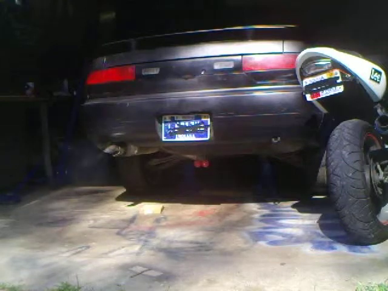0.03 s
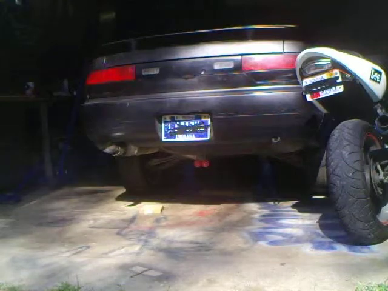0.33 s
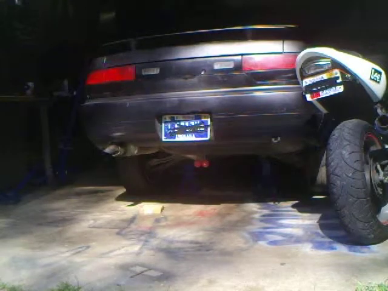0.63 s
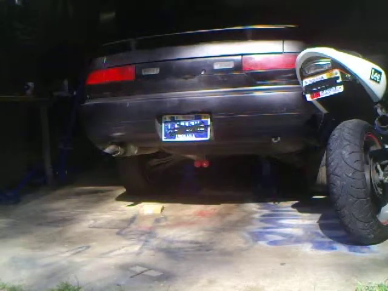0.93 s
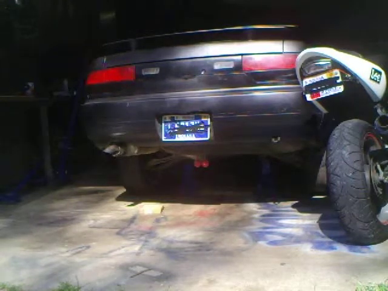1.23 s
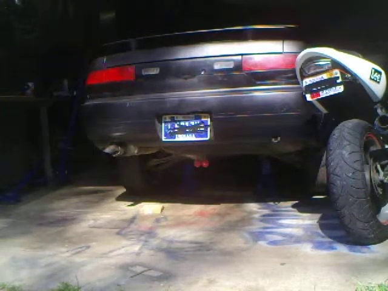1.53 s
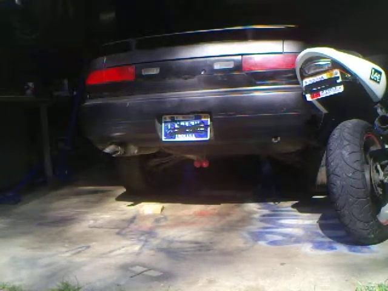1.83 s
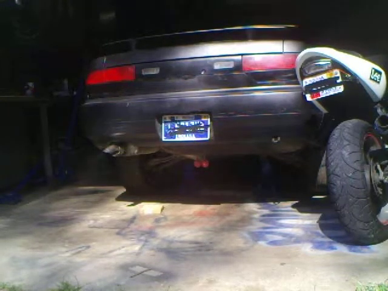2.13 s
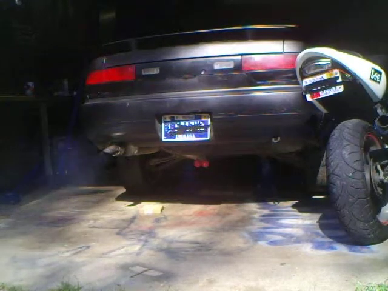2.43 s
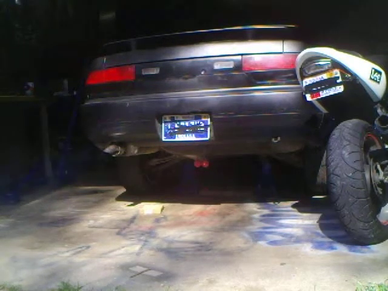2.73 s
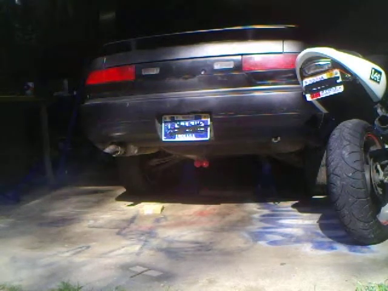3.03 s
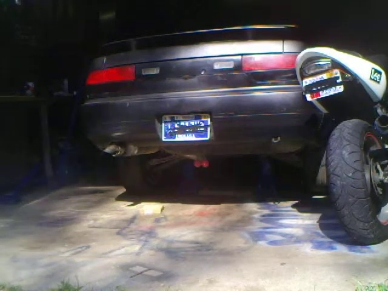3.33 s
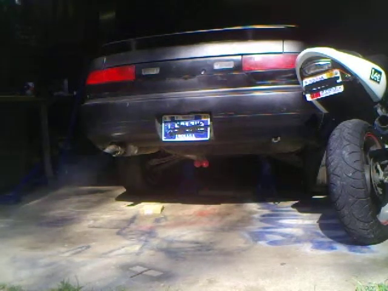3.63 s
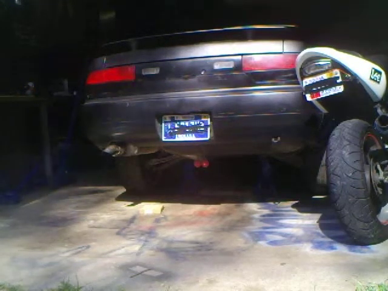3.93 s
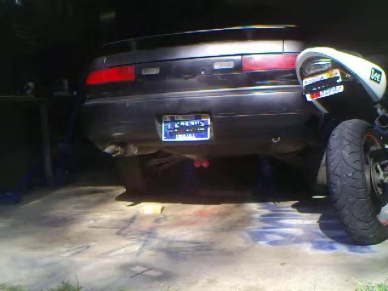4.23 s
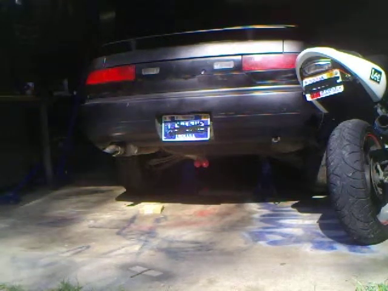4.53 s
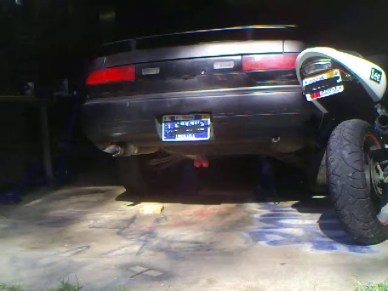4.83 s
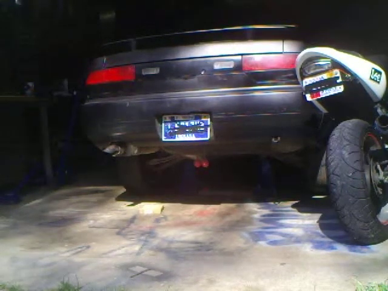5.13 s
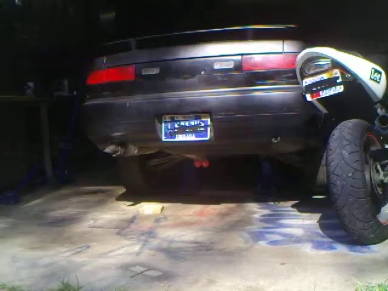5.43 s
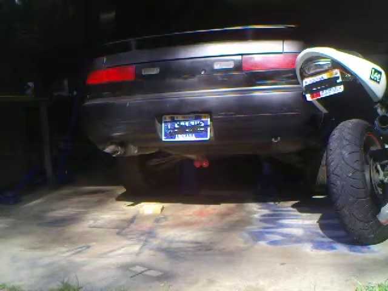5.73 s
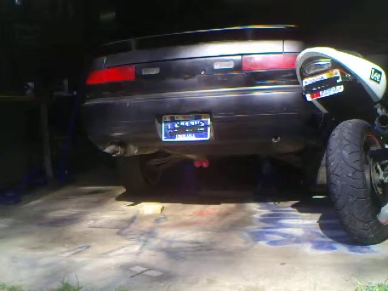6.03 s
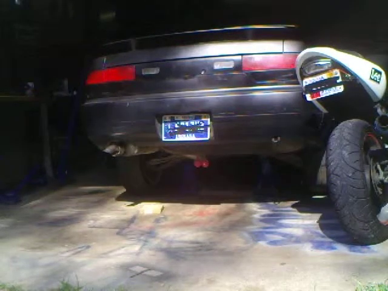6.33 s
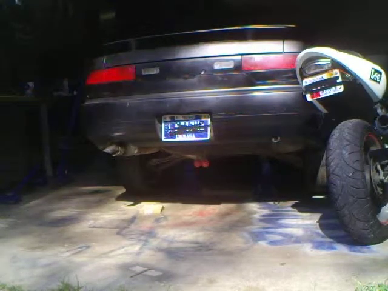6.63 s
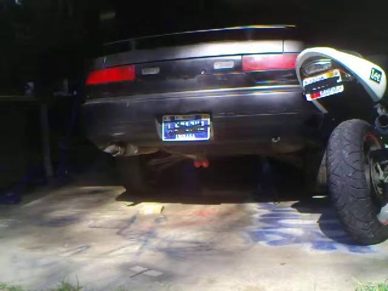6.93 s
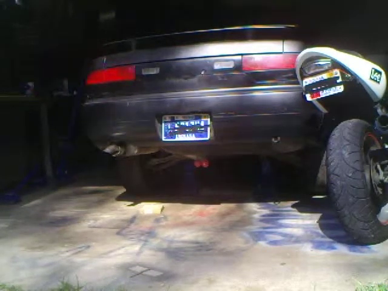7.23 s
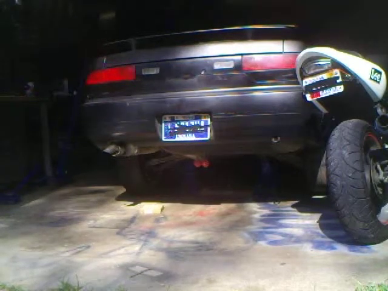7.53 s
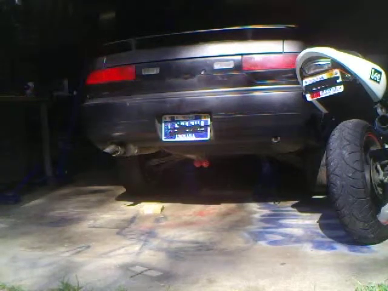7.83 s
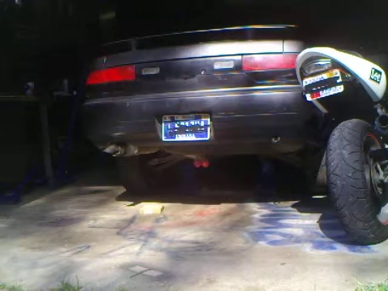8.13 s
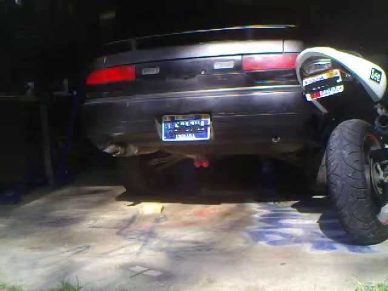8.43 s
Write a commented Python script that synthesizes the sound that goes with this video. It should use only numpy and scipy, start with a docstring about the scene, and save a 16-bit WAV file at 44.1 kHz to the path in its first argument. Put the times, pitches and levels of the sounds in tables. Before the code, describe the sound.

From a few metres behind a car in a garage, a small microphone with little treble picks up a boomy, raspy exhaust. The engine surges, sputters and falls toward idle, then climbs steeply and hits high revs three times, misfiring and popping. It winds slowly down to a quieter rumble with softly whirring belts. Two gentle blips follow, with a single exhaust pop between them.

```python
"""A loud four-cylinder exhaust flares up in a garage, is revved hard until it stutters, sinks to idle
and is blipped twice. Each firing sends a pressure spike and a rasp of gas down the ringing tailpipe;
unburnt fuel pops in it. Fan and belts whir at light load.
Heard a few metres behind the car through a small narrow-band microphone."""
import sys
import numpy as np
from scipy import signal
from scipy.fft import rfft, irfft
from scipy.io import wavfile
from scipy.ndimage import uniform_filter1d

SR = 44100
rng = np.random.default_rng(int(sys.argv[2]) if len(sys.argv) > 2 else 0)


def file_out(sig):
    """Save sig as 16-bit WAV at sys.argv[1]."""
    # one column per channel
    cols = np.atleast_2d(sig).T
    # limit, then scale
    lim = np.clip(cols, -1, 1)
    pcm = np.round(lim * 32767).astype(np.int16)
    wavfile.write(sys.argv[1], SR, pcm)


N = 378819
TIME_S = np.arange(N) / SR

# engine speed: t/s, firing rate/Hz
ENGINE_SPEED = [(0.0, 91.86), (0.23, 124), (1.13, 71.5), (1.6, 50.7), (1.99, 47.74), (2.67, 180.2),
                (3.07, 164.07), (3.31, 193.9), (3.63, 170.2), (3.88, 193.7), (4.46, 150.5), (5.15, 106.1),
                (6.08, 55.72), (6.6, 43.45), (6.92, 43.12), (7.26, 74.93), (7.7, 54.37), (8.32, 43.57),
                (8.59, 61.4)]
# throttle presses: t open/s, t close/s, rise/s, load/0-1
PRESSES = [(-.1, 0.177, .05, .32), (1.693, 1.967, 0.11, 0.02), (1.952, 2.654, 0.055, 0.89),
           (3.06, 3.273, 0.027, 0.96), (3.625, 3.76, .04, 0.81), (6.75, 7.092, 0.32, 0.22),
           (7.074, 7.306, 0.03, 0.03), (8.224, 8.62, .3, 0.12)]
# misfiring spells: t start/s, t end/s, severity/0-1, sag of drone, bark and rasp/dB
MISFIRE_SPELLS = [(0.228, 0.375, 0.65, -7), (.36, 0.541, 0.5, -2.5), (1.37, 1.55, 0, -2),
                  (2.88, 2.98, 0.83, 0), (2.98, 3.052, 0.9, -5.5), (3.279, 3.63, 0.6, 1.5),
                  (3.601, 3.653, 0.94, -7), (3.826, 4.12, 0.76, 0.5), (6.072, 6.24, 0.43, -1)]
# afterfire: t/s, crack level/dB, thump level/dB
AFTERFIRE_POPS = [(0.2942, -16, -4), (0.3373, -3.5, -40), (1.476, -27, -17), (2.945, 2, -16),
                  (3.325, -10, -20), (3.474, -0.5, -8), (3.583, -3, -4), (3.614, 1, -32), (3.868, -3.5, -9),
                  (4.044, -3.5, -15), (4.112, 5, -12.5), (5.12, -18, -24), (6.18, -31, -14),
                  (7.592, -5.5, -22), (7.679, -39, -12.5)]
# imbalance of the four cylinders in uneven combustion: level/dB
IMBALANCE_DB = [3.5, -0.5, -3.5, 3]

# standing-wave boom: firing rate/Hz, level shut/dB, level open/dB
BOOM_BY_RATE = [(43, -53, -41), (47, -45, -32), (54, -39.5, -40), (62.6, -35, -32), (73, -25, -34),
                (89.8, -23.5, -16), (95.6, -28.5, -21), (102.6, -23, -17.5), (121.2, -29, -24),
                (125, -17.5, -16.5), (147, -18, -13), (166, -23, -17), (171, -24, -16)]
# gas flow, as the equivalent shut-throttle rate: firing rate/Hz, bark level/dB, rasp level/dB
LEVELS_BY_FLOW = [(43.3, -62, -51), (50.3, -59.5, -48.5), (61, -42.5, -43), (81, -32.5, -39.5),
                  (95.5, -35, -37.5), (113.5, -24.5, -28), (133.3, -16.5, -19.5), (153, -20, -20),
                  (183.75, -19.5, -17.5), (260, -20, -15)]
# throttle shut: firing rate/Hz, drone level/dB, unevenness/0-1
COAST_BY_RATE = [(43, -38.5, 0.3), (49.5, -41, 0.5), (67, -32, 0.1), (78, -38, .3), (109, -38, .55),
                 (125, -41.5, .1), (154, -43, .1), (176, -35.5, 0.5)]
# throttle open: firing rate/Hz, thrum level/dB, bark change/dB
PULL_BY_RATE = [(43.1, -35, 3), (53, -25, 1), (73.4, -26, -5), (90, -18.5, -2.5), (121, -25, 1.5),
                (184, -52.5, -1)]

# tailpipe resonances: f/Hz, width/Hz, level/dB
PIPE_MODES = [(273.4, 30, 5.5), (339.4, 15, 6), (456.7, 49, 7), (518.7, 37, 8.5), (599, 51, 8),
              (724.5, 22, 11), (817, 12, 5.5), (843, 8.3, 7.5), (882, 10, 4), (1076.5, 16, 5.5),
              (1591, 40, 3.5), (1980, 31, 2), (2280, 60, -4), (2405, 46, 5.5), (3200, 120, 2),
              (3483, 99, 5.5)]
# pressure spike: f/Hz, level/dB
SPIKE_SPECTRUM = [(70, -3), (150, -1.5), (260, 2.5), (380, 0.5), (550, -2), (800, -1.5), (1050, -15),
                  (1500, -10.5), (2100, -7), (2800, -13), (3600, -21), (4500, -17)]
# gas churning in the pipe: f/Hz, level/dB
CHURN_SPECTRUM = [(100, -12), (270, -2.5), (450, -1.5), (800, -5.5), (1600, -21)]
# silencer, coasting: f/Hz, level/dB
DRONE_SPECTRUM = [(25, -13), (60, -11), (88, 12.5), (108, -16), (128, -2.5), (148, 9), (178, -3.5),
                  (260, -7), (420, -50.5), (1000, -79)]
# silencer under load: f/Hz, level/dB
THRUM_SPECTRUM = [(50, -20.5), (95, 4), (155, 5.5), (210, -7.5), (300, -7.5), (450, -29.5), (1000, -51)]
# gas rasp: f/Hz, level/dB
RASP_SPECTRUM = [(60, -13.5), (300, -17), (600, -10), (950, -4), (1200, -5.5), (1450, -8), (1900, -1.5),
                 (2400, -3), (2800, -10), (3650, -4.5), (4500, -11.5)]
# afterfire crack: f/Hz, level/dB
CRACK_SPECTRUM = [(40, -10), (200, -5), (480, -6.5), (740, 1.5), (1100, 0.5), (2100, 5), (2800, -2),
                  (3600, 4), (4500, -11.5)]
# fan and belts: f/Hz, level/dB
WHIR_SPECTRUM = [(100, -13), (280, 4), (380, 0.5), (475, 3.5), (560, -13.5), (930, -8), (1170, 6.5),
                 (1470, -5), (2400, 0.5), (2700, -5.5), (3200, 1), (3650, -3.5), (4000, -10.5)]


def exhaust(shock_db=7):
    """Firings boom, drone in the silencer, bark in the tailpipe and rasp; bay whir is blended in."""
    rate_hz, load, pull, misfire, sag_db = engine()
    uneven, boom_db, drone_db, thrum_db, bark_db, rasp_db = response(rate_hz, load, pull, misfire, sag_db)
    phase, spikes, age_s, strength = firings(rate_hz, uneven)
    # mean flow is silent, its fundamental is the boom, the rest excites the pipe
    spikes = spikes - (1 + 2 * np.cos(phase)) * rate_hz / SR
    boom = np.sqrt(2) * np.cos(phase) * undb(boom_db)
    drone = silencer(spikes, pull, drone_db, thrum_db)
    steep = .5 + .5 * np.tanh((bark_db + 27) / 10)  # 0 round wave, 1 shock
    ring = tailpipe(spikes, steep)
    puffs = gas_puffs(age_s, strength, load)
    bark = (ring + gas_churn(puffs, steep)) * undb(bark_db)
    rasp = gas_rasp(puffs, undb(shock_db) * steep * spikes)
    return boom + drone + bark + blend_engine_bay(rasp, rasp_db, rate_hz)


def engine(flywheel_s=.08, close_s=0.034, misfire_edge_s=0.013, half_pull_load=0.027):
    """Running state: flywheel-smoothed speed, throttle load and misfiring."""
    rate_hz = np.interp(TIME_S, *np.transpose(ENGINE_SPEED))
    rate_hz = uniform_filter1d(rate_hz, int(flywheel_s * SR), mode="nearest")
    load = sum(depth * gate(start_s, end_s, rise_s, close_s) for start_s, end_s, rise_s, depth in PRESSES)
    load = np.clip(load, 0, 1)
    pull = load / (load + half_pull_load)  # 0 coasting, near 1 driving
    misfire, sag_db = sum(np.outer(effects, gate(start_s, end_s, misfire_edge_s, misfire_edge_s))
                          for start_s, end_s, *effects in MISFIRE_SPELLS)
    return rate_hz, load, pull, misfire, sag_db


def response(rate_hz, load, pull, misfire, sag_db, load_flow=0.44, load_uneven=.08,
             load_bark_db=5, load_rasp_db=2, misfire_boom_db=-5.5, misfire_drone_db=7):
    """Unevenness and layer levels: load adds gas and evens the burn; misfires break it into rumble."""
    shut_db, open_db = at_rate(BOOM_BY_RATE, rate_hz)
    drone_db, uneven = at_rate(COAST_BY_RATE, rate_hz)
    thrum_db, bark_change_db = at_rate(PULL_BY_RATE, rate_hz)
    bark_db, rasp_db = at_rate(LEVELS_BY_FLOW, rate_hz * (1 + load_flow * load)) + sag_db
    uneven = uneven + (load_uneven - uneven) * load + misfire
    boom_db = shut_db + (open_db - shut_db) * pull + misfire_boom_db * misfire
    drone_db = drone_db + misfire_drone_db * misfire + sag_db
    bark_db = bark_db + bark_change_db * pull + load_bark_db * load
    rasp_db = rasp_db + load_rasp_db * load
    return uneven, boom_db, drone_db, thrum_db, bark_db, rasp_db


def firings(rate_hz, uneven, scatter_db=3.5, jitter_cycles=.035, lead_cycles_per_db=.009):
    """One pressure spike per firing; uneven burns differ in strength and timing."""
    cycles = np.cumsum(rate_hz) / SR
    index = np.arange(1, int(cycles[-1]))
    rough = np.clip(np.interp(index, cycles, uneven), 0, 1)
    timing_draw, level_draw = rng.standard_normal((len(index), 2)).T
    cylinder_db = np.take(IMBALANCE_DB, index, mode="wrap")
    # stronger waves run faster and arrive early: growl between the harmonics
    shift_cycles = rough * (jitter_cycles * timing_draw - lead_cycles_per_db * cylinder_db)
    onset_s = np.interp(index + shift_cycles, cycles, TIME_S)
    strength = undb(rough * (cylinder_db + scatter_db * level_draw))
    strength /= uniform_filter1d(strength, size=8)
    spikes = np.zeros(N)
    spikes[np.round(onset_s * SR).astype(int)] = strength
    latest = np.maximum(np.searchsorted(onset_s, TIME_S) - 1, 0)
    age_s = np.abs(TIME_S - onset_s[latest])
    return 2 * np.pi * cycles, spikes, age_s, strength[latest]


def tailpipe(spikes, steep, soft_hz=340):
    """Spikes ring the pipe; strong waves steepen into shocks, weak ones stay round."""
    sharp = colour(spikes, SPIKE_SPECTRUM, PIPE_MODES)
    ring = steep * sharp + (1 - steep) * lowpass(sharp, soft_hz)
    return unit_rms(garage(ring, wet_db=-14, wall_db=-17))


def silencer(spikes, pull, drone_db, thrum_db):
    """Hollow drone when coasting; a little throttle turns it into a full thrum."""
    drone = unit_rms(colour(spikes, DRONE_SPECTRUM)) * undb(drone_db)
    thrum = unit_rms(colour(spikes, THRUM_SPECTRUM)) * undb(thrum_db)
    return (1 - pull) * drone + pull * thrum


def gas_puffs(age_s, strength, load, decay_s=0.0028, leak=0.51):
    """A gas burst after each firing, over a steady flow that fades with load."""
    burst = strength ** 1.24 * np.exp(-age_s / decay_s)
    return (leak * (1 - 0.97 * load) + burst) * rng.standard_normal(N)


def gas_churn(puffs, steep, level_db=-6):
    """Gas churns in the pipe and blurs the note, most when the waves are weak."""
    return undb(level_db) * (1 - .78 * steep) * unit_rms(colour(puffs, CHURN_SPECTRUM, PIPE_MODES))


def gas_rasp(puffs, shocks):
    """Puffs and shocks leave the pipe as a bright rasp."""
    return unit_rms(garage(colour(puffs + shocks, RASP_SPECTRUM, PIPE_MODES), wet_db=-7))


def afterfire(shock_s=0.0007, burn_s=0.0085, burn_db=-8, thump_s=0.0023, thump_db=-5, crack_db=1):
    """Unburnt fuel pops: shock front, short roar of burning gas, thump in the silencer."""
    crack, thump = np.zeros(N), np.zeros(N)
    age_s = TIME_S[:SR // 8]
    shock = age_s / shock_s * np.exp(1 - age_s / shock_s)
    for onset_s, pop_crack_db, pop_thump_db in AFTERFIRE_POPS:
        start = int(onset_s * SR)
        span = slice(start, start + len(age_s))
        roar = undb(burn_db) * rng.standard_normal(len(age_s)) * np.exp(-age_s / burn_s)
        crack[span] += undb(pop_crack_db) * (shock + roar)
        thump[span] += undb(pop_thump_db) * np.exp(-age_s / thump_s)
    crack = garage(colour(crack, CRACK_SPECTRUM, PIPE_MODES), wet_db=-1.5)
    return undb(crack_db) * crack + undb(thump_db) * colour(thump, DRONE_SPECTRUM)


def blend_engine_bay(rasp, rasp_db, rate_hz, crossover_db=-40, db_per_octave=9, trim_db=3.0):
    """Fan and belt whir replaces a weak rasp at equal power; the crossover level rises with speed."""
    threshold_db = crossover_db + db_per_octave * np.log2(rate_hz / 100)
    whir_share = 1 / (undb(rasp_db - threshold_db) ** 2 + 1)
    whir = unit_rms(colour(rng.standard_normal(N), WHIR_SPECTRUM))
    return (np.sqrt(1 - whir_share) * rasp + np.sqrt(whir_share) * whir) * undb(rasp_db + trim_db)


def garage(x, wet_db, t60_s=0.26, build_s=0.00093, wall_s=.016, wall_db=-10, highpass_hz=260):
    """Direct sound, plus back-wall slap and short diffuse tail above the bass."""
    age_s = TIME_S[:SR // 2]
    tail = rng.standard_normal(len(age_s)) * undb(-60 * age_s / t60_s) * (1 - np.exp(-age_s / build_s))
    tail *= undb(wet_db) / np.sqrt(np.sum(tail ** 2))
    tail[int(wall_s * SR)] += undb(wall_db)
    tail = signal.sosfilt(signal.butter(2, highpass_hz, "high", fs=SR, output="sos"), tail)
    return x + signal.fftconvolve(x, tail)[:N]


def colour(x, spectrum, modes=(), taps=8192):
    """Minimum-phase filter: spectral outline plus resonances."""
    f_hz = np.maximum(np.fft.rfftfreq(taps, 1 / SR), 1)
    gain_db, = at_rate(spectrum, f_hz)
    for centre_hz, width_hz, peak_db in modes:
        gain_db += peak_db / ((2 * (f_hz - centre_hz) / width_hz) ** 2 + 1)
    cepstrum = irfft(np.log(undb(gain_db)))
    cepstrum[1:taps // 2] *= 2
    cepstrum[taps // 2 + 1:] = 0
    impulse = irfft(np.exp(rfft(cepstrum)))
    return signal.fftconvolve(x, impulse)[:N]


def at_rate(table, f_hz):
    """Table columns interpolated over log frequency."""
    knots_hz, *columns = np.transpose(table)
    return [np.interp(np.log(f_hz), np.log(knots_hz), column) for column in columns]


def gate(start_s, end_s, rise_s, fall_s):
    """Trapezoid, 0-1: rises from start_s, falls from end_s."""
    return np.clip((TIME_S - start_s) / rise_s, 0, 1) * np.clip(1 - (TIME_S - end_s) / fall_s, 0, 1)


def unit_rms(x, window_samples=3000):
    """Running rms held at 1; single firings keep their shape."""
    power = uniform_filter1d(uniform_filter1d(x * x, window_samples), window_samples // 2)
    return x / np.sqrt(power + 1e-18)


def lowpass(x, cutoff_hz, order=2):
    """Butterworth low-pass."""
    return signal.sosfilt(signal.butter(order, cutoff_hz, fs=SR, output="sos"), x)


def undb(db):
    """Decibels to gain."""
    return 10 ** (np.asarray(db) / 20)


def scene():
    """Running engine and its pops, mono."""
    return (exhaust() + afterfire())[None]


def record(dry, soft_limit=0.67, hard_limit=0.72, band_hz=3950, edge_hz=4400, top_hz=15800):
    """Narrow-band microphone: rounds peaks, cuts the treble, clips the tallest spikes."""
    rounded = soft_limit * np.tanh(lowpass(dry, 7400, order=4) / soft_limit)
    narrow = lowpass(rounded, band_hz, order=20)
    narrow = signal.sosfilt(signal.ellip(8, .2, 80, edge_hz, fs=SR, output="sos"), narrow)
    clipped = np.clip(narrow, -hard_limit, hard_limit)
    return signal.sosfilt(signal.ellip(8, .2, 70, top_hz, fs=SR, output="sos"), clipped)


dry = scene()
out = record(dry)
file_out(out)
```